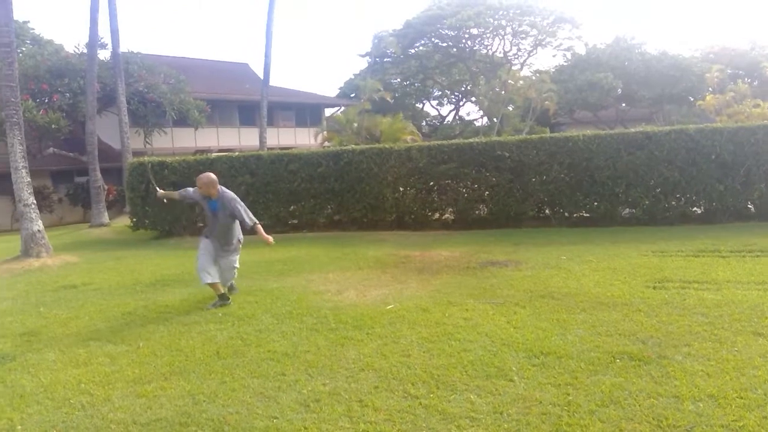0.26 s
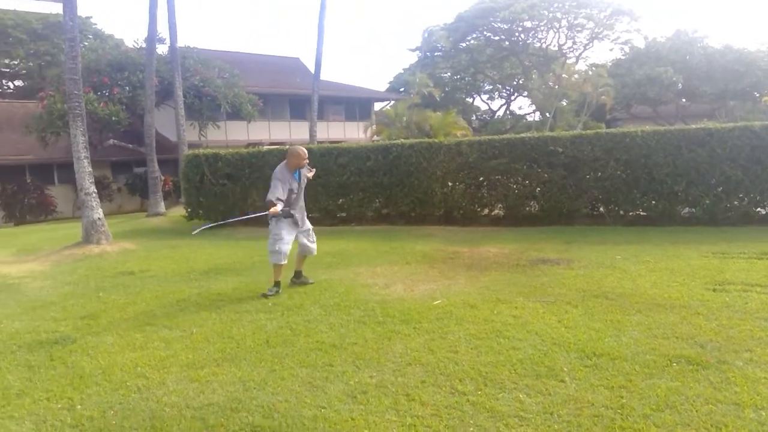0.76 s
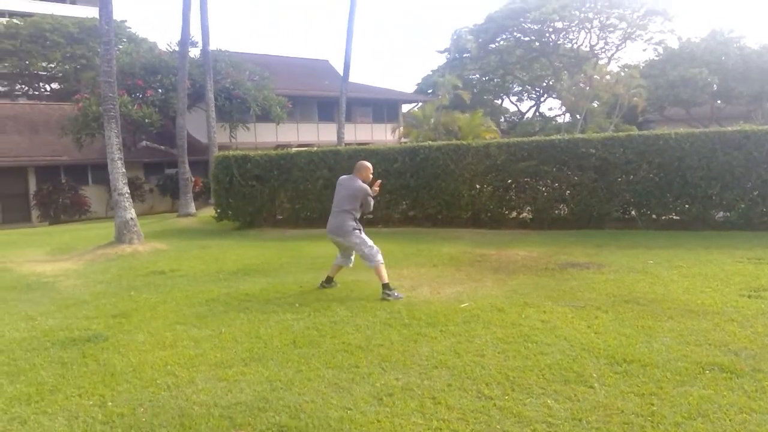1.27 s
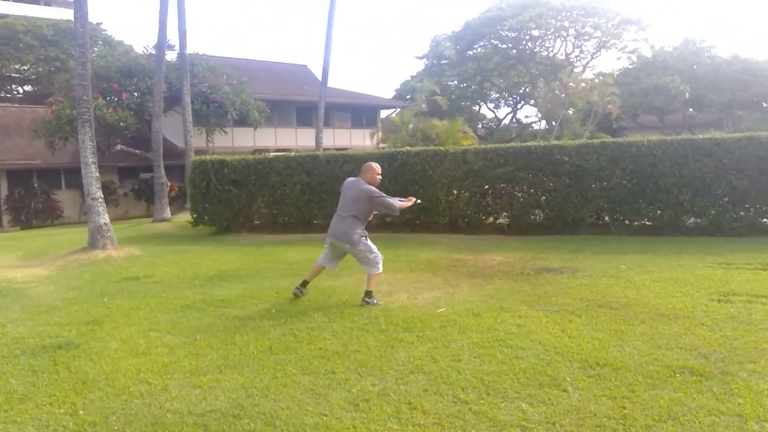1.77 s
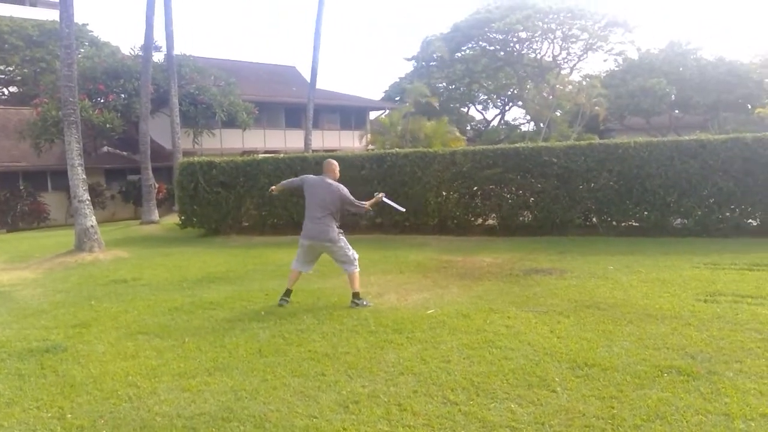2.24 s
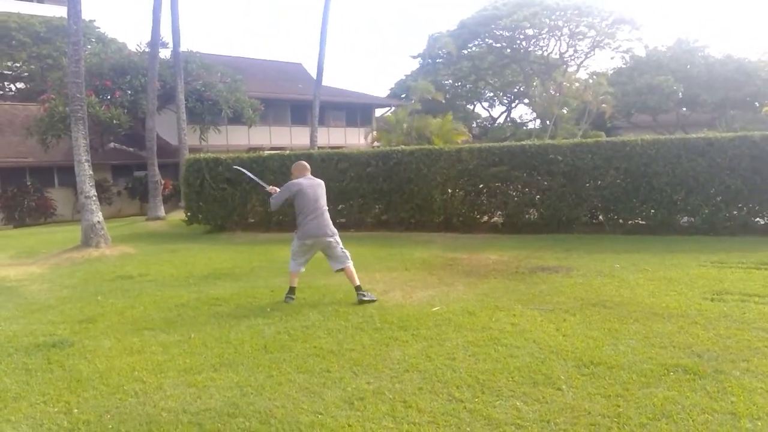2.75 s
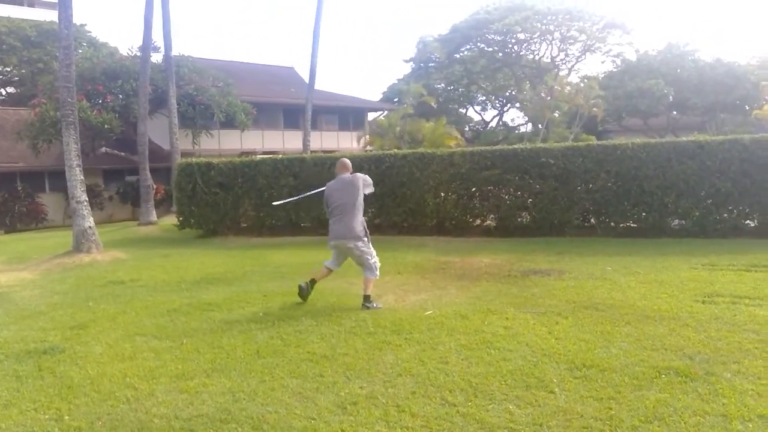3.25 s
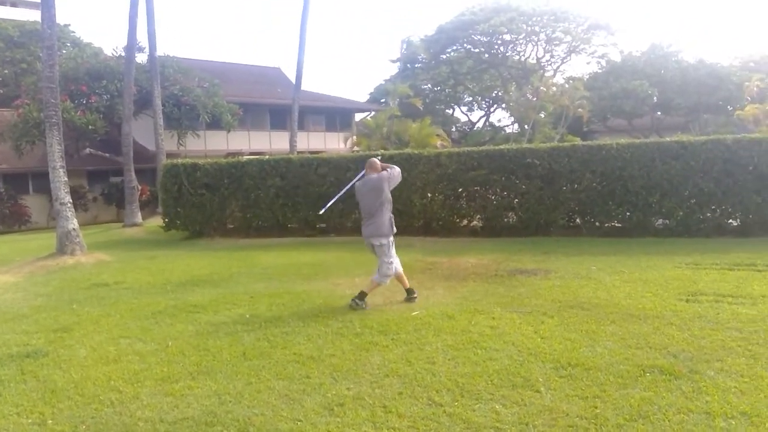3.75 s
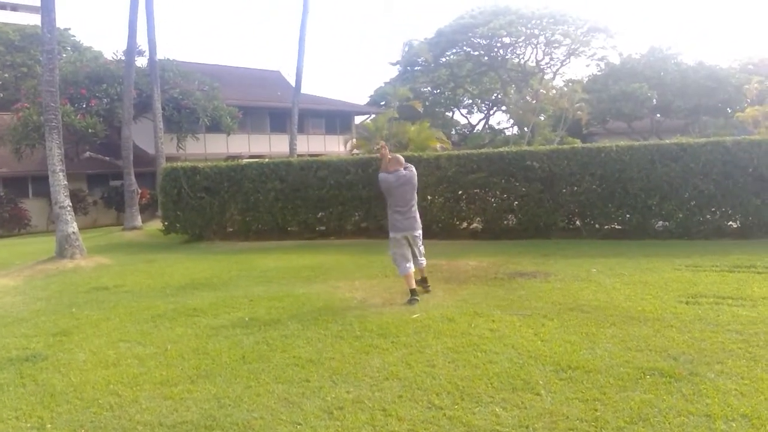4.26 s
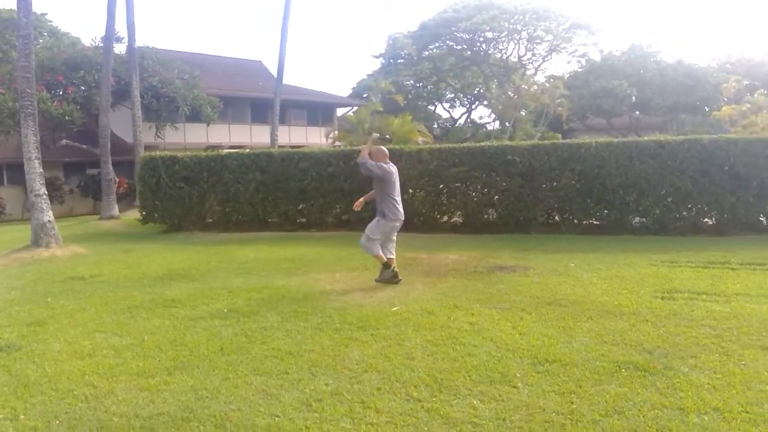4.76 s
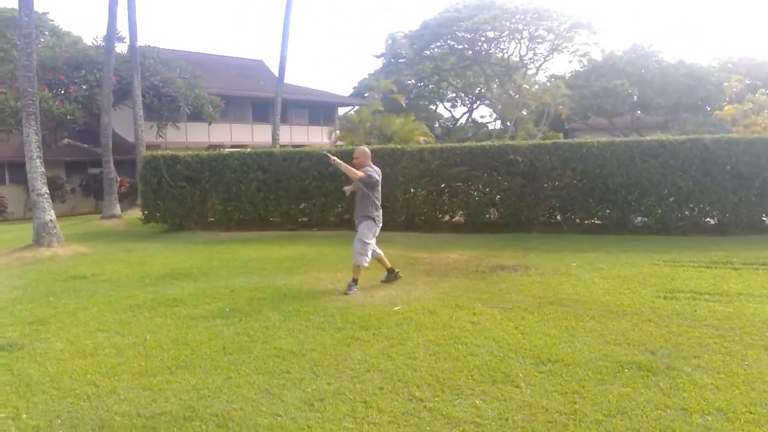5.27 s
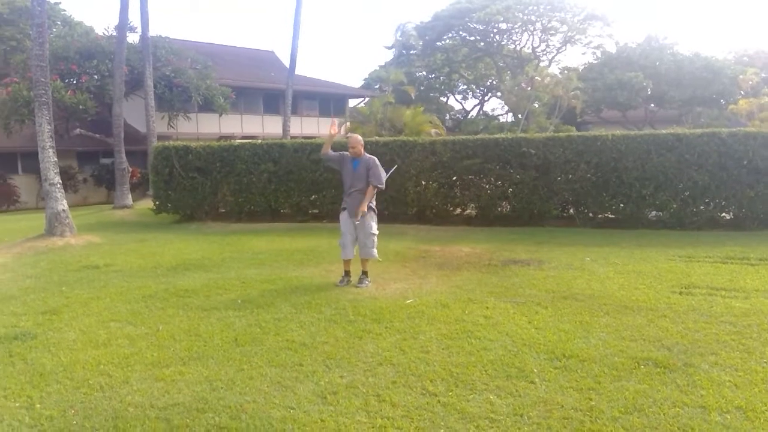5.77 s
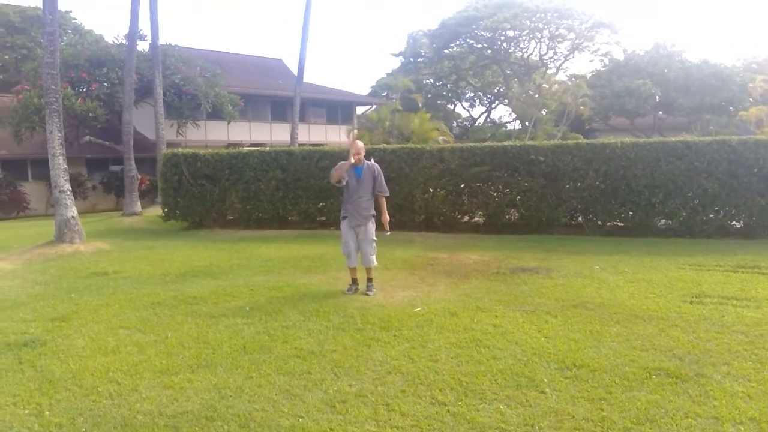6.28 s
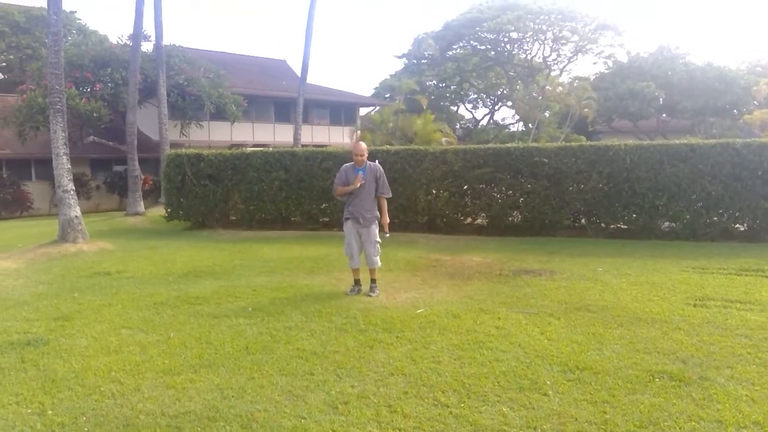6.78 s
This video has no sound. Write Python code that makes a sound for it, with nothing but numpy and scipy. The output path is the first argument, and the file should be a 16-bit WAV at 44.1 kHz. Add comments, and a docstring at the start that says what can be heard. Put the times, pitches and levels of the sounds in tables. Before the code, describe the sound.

Metal jingles and rustles close on the right, then a songbird warbles and slides over soft dove coos, gentle wind and low thuds outdoors.

```python
"""Metal jingles first, close on the right, as struck modes amid wind, rustle and rush of filtered noise.
Then, on a lawn among trees and houses, a songbird on the right sings warbles, trills and steep slides:
gliding sines with overtones. Doves on the left and right, some fainter and farther, coo as throbbing
near-sines. Chirps and a speckle of short falling tones lie behind, low knocks strike one port at a time
as symmetric pulses, and hedges and walls return a diffuse echo by convolution with decaying noise."""
import sys
import numpy as np
from scipy import signal
from scipy.fft import rfft, irfft
from scipy.io import wavfile
from scipy.ndimage import uniform_filter1d

SR = 44100
rng = np.random.default_rng(int(sys.argv[2]) if len(sys.argv) > 2 else 0)


def unload_audio(sound):
    """Save the sound as a 16-bit wav file, at the path given as the first command line argument."""
    columns = np.transpose(np.atleast_2d(sound))
    # keep every value between -1 and 1, then stretch to whole-number steps
    steps = np.round(np.clip(columns, -1, 1) * 32767)
    wavfile.write(sys.argv[1], SR, steps.astype(np.int16))


def rack_gain(trim_db):
    """Turn a fader trim in dB into the linear factor to multiply a signal by."""
    fader = np.asarray(trim_db, float)
    return 10 ** (fader / 20)


N = 309596   # samples
PORT_LAG_S = 6.5e-5   # travel time between the two ports


def rms_one(x):
    """Normalization of power: scale to rms 1."""
    return x / np.sqrt(np.mean(x ** 2) + 1e-20)


def drift(rate_hz, channels=1):
    """Random modulation: white noise through two equal low-pass poles at rate_hz, with rms 1."""
    step = 40   # samples between the slow values
    pole = np.exp(-2 * np.pi * rate_hz * step / SR)
    noise = rng.standard_normal((channels, N // step + 2002))
    slow = signal.lfilter([1], [1, -2 * pole, pole * pole], noise)[:, 2000:]   # settled part
    return np.array([np.interp(np.arange(N) / step, np.arange(len(s)), rms_one(s)) for s in slow])


def in_time(rows):
    """Linear interpolation: the columns of a table after its time, one value a sample."""
    s, *columns = np.transpose(rows)
    return [np.interp(np.arange(N) / SR, s, c) for c in columns]


def delayed(x, lag_s):
    """Delay as linear phase: each frequency turns in proportion, so fractions of a sample are possible."""
    turn = np.exp(-2j * np.pi * np.fft.rfftfreq(N, 1 / SR) * lag_s)
    return irfft(rfft(x) * turn, N)


def placed(x, right_db):
    """Interaural-style cues: the far port hears x weaker and later, the near port hears it unchanged."""
    far = rack_gain(-abs(right_db)) * delayed(x, PORT_LAG_S)
    return np.array([far, x] if right_db > 0 else [x, far])


def echo(x, t60):
    """Diffuse reverberation: leaves and walls scatter x into a decaying noise tail, one for each port."""
    t = np.arange(int(1.6 * SR)) / SR
    build_up = np.clip(t / 0.004, 0, 1) ** 2
    tail = rng.standard_normal((2, len(t))) * rack_gain(-60 * t / t60) * build_up
    tail /= np.sqrt(np.sum(tail ** 2, axis=1, keepdims=True))
    return signal.fftconvolve(x[None], tail, axes=1)[:, :N]


def coloured(spectrum, alike):
    """Partial coherence: shaped noise, a share "alike" of its power common to both ports; rms 1.
    The common part reaches the right port first."""
    hz = np.fft.rfftfreq(N, 1 / SR) + 1
    points = np.array(spectrum)
    shape = rack_gain(np.interp(np.log(hz), np.log(points[:, 0]), points[:, 1], left=-60, right=-60))
    shared, left, right = irfft(rfft(rng.standard_normal((3, N))) * shape, N)
    common = np.sqrt(alike) * np.array([delayed(shared, PORT_LAG_S), shared])
    own = np.sqrt(1 - alike) * np.array([left, right])
    return rms_one(common + own)


def patchy(x, depth_db):
    """Time-frequency modulation: patches about 170 Hz wide and 25 ms long flicker on their own; rms 1."""
    cells = signal.stft(x, nperseg=512)[2]
    luck = rng.standard_normal(cells.shape[1:])
    luck = uniform_filter1d(luck, size=2, axis=0)   # along frequency
    luck = uniform_filter1d(luck, size=4, axis=1)   # along time
    flickering = cells * rack_gain(depth_db * rms_one(luck))
    return rms_one(signal.istft(flickering, nperseg=512)[1][:, :N])


def whistle(notes, smooth_s, edge_s, overtones_db, rough_db, rough_rate):
    """Frequency modulation of a near-sine: phase sums a gliding pitch; notes fade at their edges."""
    tone, overtones = np.zeros((2, N))
    for note in notes:
        s, hz, db = np.transpose(note)
        i = np.arange(max(int(s[0] * SR), 0), min(int(s[-1] * SR), N))
        t = i / SR
        pitch = np.interp(t, s, hz)
        pitch = uniform_filter1d(pitch, max(int(smooth_s * SR), 1), mode="nearest")
        phase = 2 * np.pi * np.cumsum(pitch) / SR
        edges = np.clip(np.minimum(t - s[0], s[-1] - t) / edge_s, 0, 1)
        level = np.sqrt(2) * rack_gain(np.interp(t, s, db)) * edges
        tone[i] += level * np.sin(phase)
        # overtones are strongest when the pitch lies near 3.2 kHz
        level = level * np.clip(pitch / 3150, 0, 1) ** 13 * np.clip(3300 / pitch, .8, 1) ** 11
        for k, overtone_db in enumerate(overtones_db, start=2):
            overtones[i] += level * rack_gain(overtone_db) * np.sin(k * phase) * (k * pitch < 15500)
    # overtones are hoarse, and the beak lets out only the high ones
    overtones *= .5 + drift(250)[0]
    overtones = signal.sosfilt(signal.butter(4, 6000, "high", fs=SR, output="sos"), overtones)
    return (tone + overtones) * rack_gain(rough_db * drift(rough_rate)[0])


# spectrum of the steady air noise: f/Hz, relative spectral density level/dB
AIR_SPECTRUM = [(530, -43), (900, -1), (1790, -5.5), (2420, -15), (4410, -20.5), (7960, -25.5),
                (14200, -41.5), (16000, -50)]


def air():
    """Broadband background noise: a steady bed that sways gently and flickers in patches."""
    sway_db = 1.0 * drift(6)
    bed = patchy(coloured(AIR_SPECTRUM, alike=0.47), depth_db=4.5)
    return rack_gain(-63.5 + sway_db + [[-1.5], [1.5]]) * bed


# level of the distant rush: t/s, level/dB (mean of the ports)
RUSH_LEVEL = [(0, -59.5), (1.7, -61), (2.3, -61), (3.5, -66), (3.9, -63), (5.2, -64.5), (5.4, -57.5),
              (5.8, -64), (7.02, -60)]
# spectrum of the rush, also of the low rush under the coos: f/Hz, relative spectral density level/dB
RUSH_SPECTRUM = [(120, -43), (200, -7.5), (419, -12.5), (568, -10.5), (862, -7), (1000, -14.5), (1300, -27),
                 (2200, -120)]


def rush():
    """Band-limited noise: a distant low rush under slow random level modulation."""
    rush_db, = in_time(RUSH_LEVEL)
    level = rack_gain(rush_db + 1.5 * drift(7) + [[-1.2], [1.2]])
    return level * coloured(RUSH_SPECTRUM, alike=.7)


# level of the wind on the ports: t/s, level/dB (mean of the ports), left minus right level/dB
WIND_LEVEL = [(0.0, -50.5, 1), (2.5, -55, 0.5), (2.58, -47.5, 14), (3.38, -49, -2.5), (4.1, -57, 3),
              (4.36, -44, 15), (4.55, -50, 3), (4.91, -55.5, -2), (7.02, -50.5, 1)]
# spectrum of the wind: f/Hz, relative spectral density level/dB
WIND_SPECTRUM = [(12, -29), (20, 6), (96, -7.5), (166, -14.5), (198, -17), (400, -29.5), (520, -42),
                 (880, -120)]


def wind():
    """Turbulent pressure noise: a low rumble whose level wavers separately at each port."""
    wind_db, pan_db = in_time(WIND_LEVEL)
    level = rack_gain(wind_db + pan_db * [[.5], [-.5]] + 2.7 * drift(18, channels=2))
    return level * coloured(WIND_SPECTRUM, alike=0.82)


# low knocks: t/s, peak level/dB, f/Hz, sign of the peak (+1 or -1), port (0 left, 1 right)
LOW_KNOCKS = [(2.625, -24, 112, 1, 0), (3.483, -26.5, 130, 1, 1), (3.5418, -26.5, 128, -1, 0),
              (4.139, -28, 126, 1, 0), (4.175, -22, 168, -1, 0)]


def knocks():
    """Gaussian-windowed cosine: symmetric low pulses on one port, cut off abruptly with faint ticks."""
    out = np.zeros((2, N))
    t = np.arange(-.0113 * SR, .0113 * SR) / SR
    for s, peak_db, hz, sign, port in LOW_KNOCKS:
        at = int((s + t[0]) * SR)
        pulse = np.cos(2 * np.pi * hz * t) * np.exp(-(t * hz / 1.56) ** 2)
        out[int(port > .5), at:at + len(t)] += np.sign(sign) * rack_gain(peak_db) * pulse
    return out


# level of the rustle: t/s, level/dB before the port offsets
RUSTLE_LEVEL = [(0, -71), (.25, -81), (.3, -66), (.41, -62), (.45, -70), (.54, -65), (.58, -58), (.7, -64),
                (.93, -65), (1.06, -73), (1.3, -71.5), (1.5, -73), (1.75, -68.5), (2.05, -72.5),
                (3.07, -71), (3.3, -67.5), (3.56, -74), (7.02, -98)]
# spectrum of the rustle: f/Hz, relative spectral density level/dB
RUSTLE_SPECTRUM = [(2200, -30), (3000, -6), (5500, 1), (9000, -5.5), (13500, -10), (16000, -11)]


def rustle():
    """Amplitude-modulated high noise: a bright rustle close on the right flickers, whole and in patches."""
    rustle_db, = in_time(RUSTLE_LEVEL)
    flicker_db = 1.2 * drift(10) + 1.5 * drift(90)
    noise = patchy(coloured(RUSTLE_SPECTRUM, alike=0.17), depth_db=5.0)
    return rack_gain(rustle_db + flicker_db + [[-7], [4]]) * noise


# chirps of far birds: t/s, length/s, start f/Hz, end f/Hz, level/dB at the middle before placing and echo
DISTANT_CHIRPS = [(1.058, .043, 3920, 3650, -66), (1.199, .022, 3900, 3870, -63),
                  (1.983, .024, 4650, 4550, -59), (2.85, .09, 4700, 4000, -66), (4.3, .05, 4800, 3900, -69),
                  (5.096, .05, 4930, 4200, -71), (5.43, .05, 4850, 4000, -69), (6.69, .05, 4420, 3900, -72),
                  (6.855, .04, 4580, 4300, -71), (6.96, .04, 4700, 4200, -72)]


def chirps_and_speckle():
    """Frequency glides in a diffuse field: far birds' falling chirps with echo,
    and faint short falling tones at random, a speckle in the background."""
    speckle = []
    for when, long, high, loud in rng.random((50, 4)):
        hz = 1500 * (5200 / 1500) ** high   # evenly spread in octaves
        speckle.append((when * (N / SR - .1), 0.016 + 0.0587 * long, hz, .88 * hz, -80 + 8 * loud))
    glides = [[(s, hz, db - 9), (s + length / 2, (hz + 2 * end_hz) / 3, db), (s + length, end_hz, db - 7)]
              for s, length, hz, end_hz, db in DISTANT_CHIRPS + speckle]
    tones = whistle(glides, smooth_s=.004, edge_s=.008, overtones_db=[], rough_db=4.5, rough_rate=70)
    return rack_gain(-3) * placed(tones, right_db=3) + rack_gain(-5) * echo(tones, .2)


def shake(start, end, db, loudest_hz, count=14):
    """Irregular impact train: touches at uneven moments, of uneven strength."""
    return [(start + (end - start) * (k + late) / count, db - 7 * weak, loudest_hz)
            for k, (late, weak) in enumerate(rng.random((count, 2)))]


# single touches of metal: t/s, relative level/dB, f/Hz of the loudest ring
TOUCHES = [(0.0243, -54, 13400), (0.195, -47.5, 13600), (0.2689, -39, 8950), (0.2953, -37.5, 8900),
           (0.3565, -49.5, 8750), (.608, -42, 13500), (0.6266, -44, 6900), (0.673, -45, 6860),
           (0.756, -46.5, 5400), (1.6, -60.5, 13400), (1.685, -60, 14500), (1.725, -56, 14500),
           (2.1115, -49, 9400), (2.2355, -45.5, 10800), (2.3477, -49, 12800), (5.79, -61.5, 7400),
           (5.9494, -65, 11400)]
# shakes, quick runs of touches: start t/s, end t/s, relative level/dB, f/Hz of the loudest ring
METAL_SHAKES = [(0.422, 0.552, -42.5, 14400), (0.441, 0.534, -49, 6000)]
# modes of the metal: f/Hz, relative level/dB, 60 dB decay time t/s
METAL_MODES = [(5400, -3, .012), (6600, 0, .02), (7500, -4, .015), (9100, -4, .012), (10800, -4, .012),
               (11400, -6, .015), (12800, -3, .015), (13200, -5, .015), (13650, 0, .025), (14500, -5, .012)]


def jingle():
    """Modal resonance: each touch is a noisy clatter ringing all modes, most those near its loudest ring."""
    touches = TOUCHES + [touch for row in METAL_SHAKES for touch in shake(*row)]
    s, peak_db, loudest_hz = np.transpose(touches)
    at = (s * SR).astype(int)
    luck_db = rng.normal(0, 3, (len(s), len(METAL_MODES)))
    grit = rng.standard_normal(N) * rack_gain(7.1 * rng.standard_normal(N))

    def clatter(level_db):
        """Exponential decay: rough noise dying away with a 7 ms time constant after each touch."""
        strikes = np.full(N, 1e-18)
        strikes[at] = rack_gain(level_db)
        return grit * signal.lfilter([1], [1, -np.exp(-1 / (.007 * SR))], strikes)

    out = np.zeros(N)
    for k, (hz, level_db, t60) in enumerate(METAL_MODES):
        octaves_off = np.abs(np.log2(hz / loudest_hz))
        drive = clatter(peak_db + level_db - 19 + luck_db[:, k] - 20.5 * octaves_off)
        r, w = rack_gain(-60 / (t60 * SR)), 2 * np.pi * hz / SR
        out += signal.lfilter([0, np.sin(w)], [1, -2 * r * np.cos(w), r * r], drive)
    # the clatter is also heard directly, as a bright crack
    crack = clatter(peak_db - 10.5)
    out += signal.sosfilt(signal.butter(2, 4200, "high", fs=SR, output="sos"), crack)
    return placed(out, right_db=13) + rack_gain([[-18], [-11]]) * echo(out, .3)


SCOOP_S, FADE_S = .025, 0.024   # rise into the first throb, fall after the last


def coo(s, span, top_hz, db, swell_db, scoop, sag, dip_db_per_s, middle_db):
    """Joint pitch and level modulation: a low throb, a step up, a middle throb and a last, sagging one."""
    first = s + SCOOP_S
    dip_db = dip_db_per_s * span   # wider throbs part more
    return [(s, top_hz * (1 - 1.505 * scoop), db - 12),
            (first, top_hz * (1 - scoop), db),
            (first + 0.018, top_hz, db - dip_db),
            (first + span / 2, top_hz * (1 - 0.36 * sag), db + swell_db / 2 + middle_db),
            (first + 0.802 * span, top_hz * (1 - 0.34 * sag), db + 2.2 * swell_db - dip_db),
            (first + span, top_hz * (1 - sag), db + swell_db),
            (first + span + FADE_S, top_hz * (1 - 0.84 * sag), db + swell_db - 17.5)]


def hoot(s, hz, db):
    """A single pulse: one throb that rises in pitch as it dies away."""
    return [(s - SCOOP_S, hz, db - 22), (s, hz, db), (s + FADE_S, 1.1 * hz, db - 27)]


# coos of three throbs: t/s, first to last throb t/s, top f/Hz, level/dB of the first throb,
# swell from first to last level/dB, first throb's pitch below the top [fraction]
LEFT_COOS = [(2.572, 0.13, 1188, -35, 0.1, 0.13), (2.967, .075, 1161, -38.5, 1.5, 0.16),
             (3.21, 0.079, 1179, -40, 0.5, 0.16), (5.064, .12, 1257, -50, -0.5, 0.04),
             (5.871, 0.12, 1164, -36, 0, .115), (6.305, 0.073, 1148, -40, 3.5, 0.1),
             (6.566, 0.0766, 1150, -40, 3, 0.05)]
# the same columns; fainter and farther
RIGHT_COOS = [(-.03, 0.057, 1093, -53.5, -6, 0.022), (1.055, .13, 1265, -50, 5, 0.13),
              (1.35, 0.074, 1240, -52, -4, 0.011), (2.25, 0.059, 1144, -60, 4.5, 0.014),
              (4.219, 0.14, 1275, -55, 7.5, 0.15), (4.516, 0.07, 1239, -52.5, 0.5, 0.023),
              (5.299, 0.066, 1137, -62.5, 5, 0.022), (5.47, .05, 1140, -55, -2, 0.016),
              (5.715, 0.037, 1125, -60.5, -3, 0.021)]
# short hoots on the left: t/s of the throb, f/Hz, level/dB
LEFT_HOOTS = [(2.9, 980, -35), (5.31, 977, -46), (6.225, 1054, -26.5)]


def doves():
    """Near-sinusoidal phonation: soft coos near 1.1 kHz, those on the right fainter and farther;
    over them a low rush that swells whenever the left port's coos are loud."""
    left = [coo(*row, sag=0.117, dip_db_per_s=95.5, middle_db=.6) for row in LEFT_COOS]
    left += [hoot(*row) for row in LEFT_HOOTS]
    right = [coo(*row, sag=0.043, dip_db_per_s=14, middle_db=7) for row in RIGHT_COOS]
    left = whistle(left, smooth_s=0.0059, edge_s=0.014, overtones_db=[], rough_db=2.5, rough_rate=70)
    right = whistle(right, smooth_s=0.0047, edge_s=0.0038, overtones_db=[], rough_db=2.5, rough_rate=26)
    direct = placed(left, right_db=-7.5) + placed(right, right_db=9.0)
    coos = direct + rack_gain(-8) * echo(left + right, 0.73)
    swell = uniform_filter1d(np.abs(coos[0]), int(0.051 * SR)) ** 0.61
    low_rush = swell * coloured(RUSH_SPECTRUM, alike=0.89) * rack_gain([[1.5], [-1.5]])
    return coos + rack_gain(-28) * low_rush


def shaped(shape, rows):
    """Similarity scaling: one shape, sung at each row's time, pace, pitch and level."""
    return [[(s + stretch * after, ratio * hz, db + more_db) for after, hz, more_db in shape]
            for s, stretch, ratio, db in rows]


# the drop that opens a slide: t/s after its start, pitch ratio to the held note, level/dB re the slide
SLIDE_DROP = [(0, 2.1, -20), (.004, 1.52, -18), (.007, 1.18, 0), (.012, 1.04, -2.5)]


def slide(s, length, hz, db, swell_db):
    """Downward portamento: a steep drop lands on a held note, which then sags in pitch and stops."""
    landed = SLIDE_DROP[-1][0]
    held, sag = length - landed, 0.036
    hold = [(landed + .25 * held, 1, -0.5), (landed + .75 * held, 1 - sag / 2, swell_db),
            (landed + .9 * held, 1 - sag, swell_db - 3), (length, 1 - 1.5 * sag, -10)]
    return [(s + after, ratio * hz, db + more_db) for after, ratio, more_db in SLIDE_DROP + hold]


def peep(s, length, hz, end_hz, db):
    """Linear frequency glide: short, and loudest in the middle."""
    return [(s, hz, db - 9), (s + length / 2, (hz + end_hz) / 2, db), (s + length, end_hz, db - 9)]


def trill(start, end, period, low_hz, high_hz, low_db, high_db):
    """Periodic alternation: a low, falling pulse and a high one, a dip between; no two pulses are alike."""
    cycle = [(0, 1.08 * low_hz, low_db - 16), (.25, low_hz, low_db), (.45, .88 * low_hz, low_db - 14),
             (.55, .97 * high_hz, high_db - 14), (.75, high_hz, high_db)]
    return [(s + period * part, hz * rng.normal(1, .02), db + rng.normal(0, 2.5))
            for s in np.arange(start, end, period) for part, hz, db in cycle]


# opening arch: t/s, f/Hz, level/dB
OPENING_ARCH = [(1.672, 3370, -66), (1.68, 3350, -49.5), (1.721, 3890, -37.5), (1.745, 4008, -37),
                (1.766, 4016, -58.5), (1.785, 2830, -30), (1.797, 2336, -35), (1.815, 2100, -32.5),
                (1.885, 1868, -42.5)]
# a warble, two high loops and a fall: t/s after its start, f/Hz, level/dB re the row below
WARBLE_SHAPE = [(0, 4000, -18), (.004, 4500, -5), (.009, 5280, -3), (.013, 5600, -1), (.017, 4350, -4),
                (.021, 3520, -2), (.027, 4250, 1), (.036, 5080, -2.5), (.040, 4300, -5), (.045, 3000, 4),
                (.056, 2600, 1.5), (.089, 2230, -4)]
# warbles: t/s, time stretch [ratio], pitch [ratio], level/dB
WARBLE_TIMES = [(2.516, .98, .98, -31.5), (3.314, 1.04, 1.02, -33.5)]
# a turn, two low loops: t/s after its start, f/Hz, level/dB re the row below
TURN_SHAPE = [(0, 2100, -13), (.006, 2780, -3), (.014, 2790, 0), (.020, 2300, -11), (.026, 2820, -3),
              (.030, 2720, -2), (.037, 2150, -9), (.052, 2150, -20)]
# turns: t/s, time stretch [ratio], pitch [ratio], level/dB
TURN_TIMES = [(2.61, 0.9, .99, -22), (3.414, 1, 1.02, -26.5)]
# slides: t/s, length/s, held f/Hz, level/dB, swell of the held note level/dB
SONG_SLIDES = [(2.309, .066, 2290, -29.5, 2.5), (2.664, .018, 2480, -30, -3),
               (3.091, .071, 2240, -28.5, .6), (3.938, .07, 2310, -28.5, -3)]
# peeps: t/s, length/s, start f/Hz, end f/Hz, level/dB at the middle
SONG_PEEPS = [(2.165, 0.015, 2310, 1850, -41.5), (2.182, .015, 2050, 2160, -34.5),
              (2.277, 0.015, 2970, 3080, -28.5), (2.298, 0.021, 2130, 2200, -47),
              (2.967, 0.031, 2024, 1860, -44), (3.059, 0.018, 3270, 3137, -30.5),
              (3.477, 0.013, 2370, 2180, -43), (3.55, 0.018, 1865, 1730, -46.5),
              (3.802, 0.052, 2260, 2110, -52), (3.91, 0.027, 3175, 3330, -31),
              (3.931, 0.023, 2190, 2210, -40), (4.324, 0.042, 2148, 2250, -45)]
# trills: start t/s, end t/s, period/s, low f/Hz, high f/Hz, low level/dB, high level/dB
SONG_TRILLS = [(2.243, 2.276, .0145, 2200, 3030, -33, -33), (2.286, 2.29, .011, 2650, 3010, -30, -31),
               (2.681, 2.745, .0138, 2070, 2750, -33, -39), (3.029, 3.06, .013, 2680, 3200, -31, -34),
               (3.499, 3.545, .013, 2080, 2780, -38, -41), (3.859, 3.88, .0128, 2750, 3380, -35, -34),
               (3.8846, 3.915, .0125, 2800, 3340, -30, -31)]
# 2nd, 3rd and 4th harmonic: relative level/dB before the overtone shaping
OVERTONE_LEVELS = [-11.5, -15, -29.5]


def songbird():
    """Harmonic frequency modulation: clear, fast glides and trills with a near and a far echo."""
    notes = [OPENING_ARCH] + shaped(WARBLE_SHAPE, WARBLE_TIMES) + shaped(TURN_SHAPE, TURN_TIMES)
    notes += [slide(*row) for row in SONG_SLIDES]
    notes += [peep(*row) for row in SONG_PEEPS]
    notes += [trill(*row) for row in SONG_TRILLS]
    voice = whistle(notes, smooth_s=.0009, edge_s=.0025, overtones_db=OVERTONE_LEVELS,
                    rough_db=1.6, rough_rate=140)
    # leaves absorb the highs
    dulled = signal.sosfilt(signal.butter(1, 3600, fs=SR, output="sos"), voice)
    far_echo = rack_gain([[-12], [-10]]) * echo(dulled, 0.72)
    tree_echo = rack_gain(-12) * echo(voice, 0.21)   # the bird's own tree
    return placed(voice, right_db=10.5) + far_echo + tree_echo


def scene():
    """Linear superposition: the pressures of all beds and sources add."""
    beds = air() + rush() + wind() + rustle()
    return beds + knocks() + chirps_and_speckle() + jingle() + doves() + songbird()


def band_limit(x):
    """A steep low-pass at the top of the band."""
    return signal.sosfilt(signal.butter(12, 16500, fs=SR, output="sos"), x)


def record(dry):
    """Two-channel transduction: the pressures at the two ports become the finished stereo signal."""
    return band_limit(dry)


dry = scene()
out = record(dry)
unload_audio(out)
```